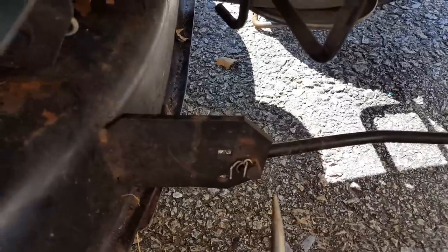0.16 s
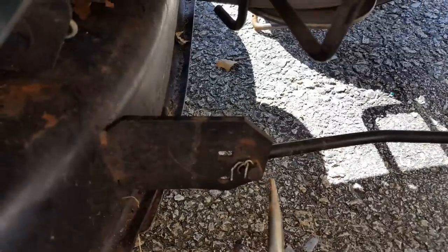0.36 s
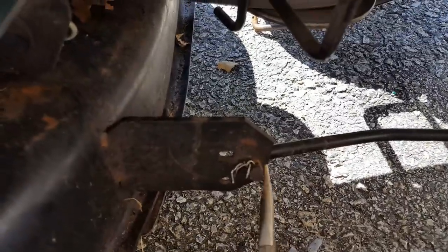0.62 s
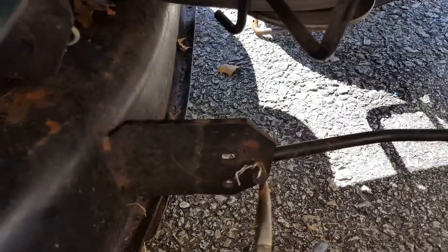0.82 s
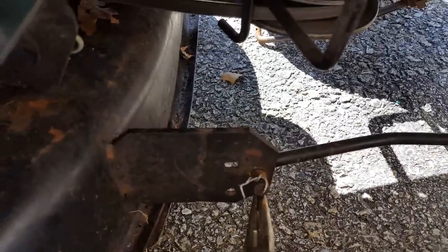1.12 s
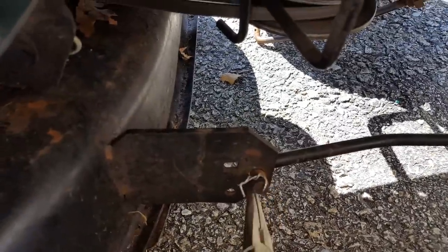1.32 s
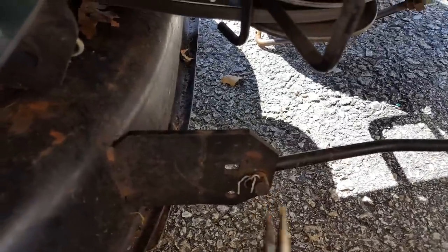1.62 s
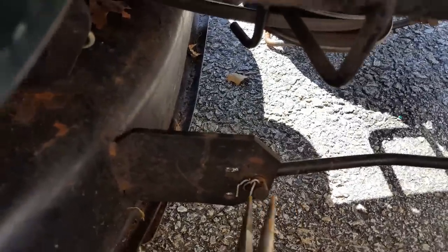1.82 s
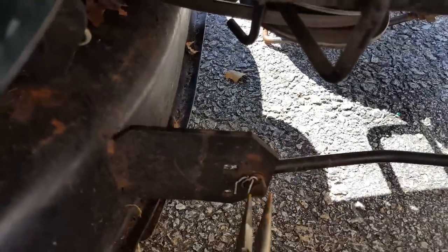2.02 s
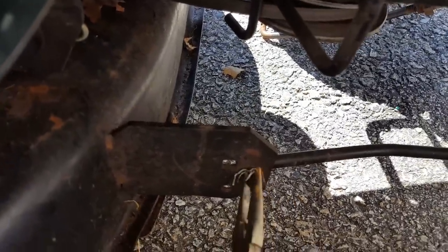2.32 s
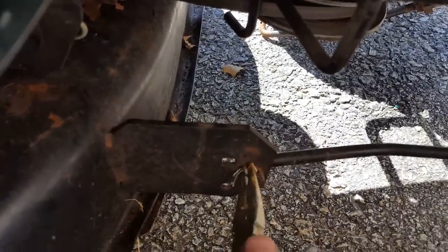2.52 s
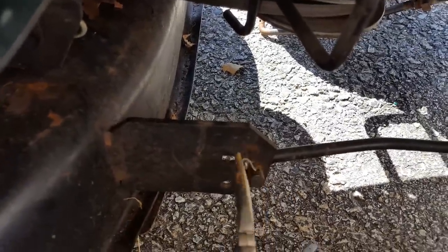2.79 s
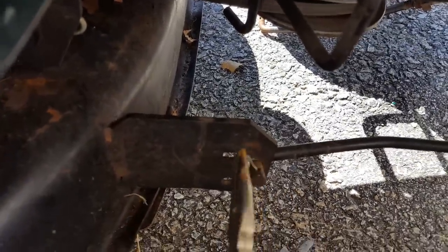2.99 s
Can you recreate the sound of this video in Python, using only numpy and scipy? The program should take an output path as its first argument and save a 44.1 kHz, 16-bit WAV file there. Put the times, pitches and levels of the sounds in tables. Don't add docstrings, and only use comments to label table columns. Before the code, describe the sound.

Close needle-nose pliers knock and scrape a wire on a steel bracket: near quiet first, a flurry of clacks, a pause, then louder, boomier knocks. Outdoors, phone microphone, faint bird, motor hum and traffic behind.

```python
import sys
import numpy as np
from scipy import signal
from scipy.fft import rfft, irfft
from scipy.io import wavfile
from scipy.ndimage import uniform_filter1d

SR = 44100
rng = np.random.default_rng(int(sys.argv[2]) if len(sys.argv) > 2 else 0)


def to_wav(s):
    ch = np.atleast_2d(s).T
    pcm = np.round(np.clip(ch, -1, 1) * 32767)
    wavfile.write(sys.argv[1], SR, pcm.astype(np.int16))


def natural_amplitude(level_db):
    exponent = np.asarray(level_db, float) / 20
    return 10 ** exponent


N = 138915

# pitch_hz, level_db
LEFT_TILT = [(200, 0.5), (600, -2), (2000, 6), (5000, 3), (14000, 9.5)]
ALIKE_HZ = 1430
LEFT_RIGHT = np.array([[1], [-1]])


def curve(table, hz):
    points = np.array(table, float)
    return np.interp(np.log(np.maximum(hz, 1)), np.log(points[:, 0]), points[:, 1])


def unit(x):
    return x / np.sqrt(np.mean(x ** 2))


def walk(rate_hz):
    hold = int(SR / rate_hz)
    steps = np.repeat(rng.standard_normal(N // hold + 1), hold)
    return 2 ** .5 * uniform_filter1d(uniform_filter1d(steps, hold), hold)[:N]


def decay(t, t60_s):
    return np.exp(-np.log(1000) * t / t60_s)


def add(out, start_s, x):
    i = int(start_s * SR)
    out[:, i:i + x.shape[1]] += x[:, :N - i]


def pliers():
    blow = steel()
    left, right = knocks(blow) + ticks(blow) + scrapes(blow)
    return np.array([left, np.roll(right, int(0.00024 * SR))])


def knocks(blow):
    # start_s, level_db, boom_db (deck), bright_db, favoured pitch_hz
    knock_events = [(.645, -20, -23.5, -27, 2380), (0.8115, -25, -16.5, -11, 2900),
                    (0.935, -31, -6, -22, 610), (1.094, -32, -4, -25, 1130), (1.534, -31, -4, -8.5, 4000),
                    (1.556, -54, -1.5, 9, 300), (2.295, -30.5, -12, -10.5, 700),
                    (2.393, -23.5, -12, -8, 1030), (2.553, -12.5, -9.5, -10.5, 1800),
                    (2.622, -26.5, -8, -6.5, 2700), (2.684, -15.5, -13, -8, 2800),
                    (2.719, -31.5, 1, -15.5, 400), (2.765, -14, -9, -5.5, 2740), (2.80, -41, 7, -26, 295),
                    (2.9989, -15.5, -19, -29.5, 1210)]
    out = np.zeros((2, N))
    for start_s, level_db, boom_db, bright_db, pitch_hz in knock_events:
        chatter_s = np.clip(.006 * natural_amplitude(.4 * (boom_db + 10)), .0005, .03)
        at = np.r_[0, rng.random(size=7)]
        hits = np.r_[1, .35 * rng.standard_normal(size=7)] * np.exp(-at)
        push = np.zeros(int(chatter_s * SR) + 2)
        np.add.at(push, (at * chatter_s * SR).astype(int), hits)
        struck = signal.fftconvolve(blow(boom_db, bright_db, pitch_hz), push[None])
        add(out, start_s, natural_amplitude(level_db - 0.5) * struck)
    return out


def ticks(blow):
    # start_s, level_db, boom_db (deck), bright_db
    tick_events = [(0.044, -45, -26, -19), (0.455, -53, -7, -6), (0.6168, -39, -8, -1.5),
                   (0.7659, -27.5, -21, -11.5), (0.9689, -44.5, -4.5, -13), (1.603, -35, -21, 0),
                   (1.648, -38.5, -26, -8), (2.168, -53.5, -25, 0.5), (2.2277, -62, -16, 7),
                   (2.285, -56, -6, 10), (2.2912, -45, -10, 6), (3.034, -52, 18, -20), (1.075, -47, 6, -23),
                   (.8153, -27, -25, -6), (.667, -30, -15, -28), (2.4464, -46.5, 5, -1.5),
                   (2.4758, -35.5, -9, -21), (2.941, -39.5, 4, -7), (2.9674, -34, -0.5, -16),
                   (3.029, -47.5, 2, -2), (3.1199, -33.5, 0.5, -10.5)]
    out = np.zeros((2, N))
    for start_s, level_db, boom_db, bright_db in tick_events:
        add(out, start_s, natural_amplitude(level_db - 4) * blow(boom_db, bright_db, 2160))
    return out


def scrapes(blow):
    # start_s, length_s, level_db, boom_db (deck), bright_db
    scrape_events = [(0.296, 0.079, -52.5, -14, -10), (0.647, 0.078, -27, -15.5, -29),
                     (0.738, 0.04, -32, -9, -11.5), (1.33, 0.12, -46.5, -15.5, -6.5),
                     (1.472, 0.2, -41, -12, -12.5), (1.536, 0.043, -29, -33, -10),
                     (2.398, 0.1, -39, -5.5, -18.5), (2.538, 0.0093, -32, -20, -31),
                     (2.63, 0.042, -36, 3, -31), (2.70, 0.096, -34, 2, -11), (2.952, 0.11, -39, 3, -9.5),
                     (3.049, 0.11, -43, -7, -12)]
    clicks_per_s, scatter_db, edge = 3700, 1.5, .17
    out = np.zeros((2, N))
    for start_s, length_s, level_db, boom_db, bright_db in scrape_events:
        chance, sign, size = rng.random((3, int(length_s * SR)))
        u = np.linspace(0, 1, len(chance))
        push = (chance < clicks_per_s / SR) * np.sign(sign - .5) * natural_amplitude(-scatter_db * np.log(size + 1e-6))
        push = unit(push) / 30 * np.clip(np.minimum(u, (1 - u) / 2) / edge, 0, 1)
        struck = signal.fftconvolve(blow(boom_db, bright_db, 333, jaw_ring=0.11), push[None])
        add(out, start_s, natural_amplitude(level_db) * struck)
    return out


def steel():
    # pitch_hz, level_db
    deck_colour = [(60, -20.5), (150, -1.5), (326, -3.5), (730, -8), (1200, -10), (1580, -13), (2380, -15),
                   (8000, -31.5)]
    # pitch_hz, t60_s
    deck_ring = [(100, 1), (300, 0.64), (1000, 0.5), (2500, 0.21), (8000, 0.084)]
    # pitch_hz, level_db, t60_s
    bracket_modes = [(170.3, -5, 0.48), (140.3, -13, 0.37), (232.4, -12, 0.48), (275.2, -10.5, 0.53),
                     (300, -8.5, 0.96), (331, -6.5, 0.92), (367.6, -6.5, 0.68), (604, -6.5, 0.7),
                     (709.5, -8.5, 0.63), (760, 3.5, 0.18), (1109, 9, 0.032), (1420, -7.5, 0.28),
                     (1886, -15, 0.12), (2338, -8.5, 0.11)]
    # pitch_hz, level_db, t60_s
    jaw_modes = [(4000, -18, 0.052), (5800, -7, .06), (6620, 3, 0.05), (6910, -27, .07), (8700, -10, 0.14),
                 (10500, -4, 0.044), (12300, -20, 0.093), (12740, -8, 0.071)]
    t = np.arange(int(.45 * SR)) / SR
    deck_hz = np.sort(rng.uniform(60 ** .5, 8000 ** .5, size=520) ** 2)
    deck_t60 = curve(deck_ring, deck_hz) * natural_amplitude(rng.standard_normal(len(deck_hz)))
    deck_db = curve(deck_colour, deck_hz) + 5 * np.log10(deck_hz / 1000) - 10
    bracket, jaw = np.array(bracket_modes), np.array(jaw_modes)
    hz = np.concatenate([deck_hz, bracket[:, 0], jaw[:, 0]])
    t60 = np.concatenate([deck_t60, bracket[:, 2], jaw[:, 2]])
    base_db = np.concatenate([deck_db, bracket[:, 1] - 2, jaw[:, 1] - 19])
    is_jaw = np.arange(len(hz)) >= len(hz) - len(jaw)
    modes = rings(hz, t60, 3.75, t).astype(np.float32)
    low = 1 / (1 + (hz / 1530) ** 4)
    high = 1 / (1 + (5000 / hz) ** 4)
    crack_hz = 4280
    crack_band = np.r_[signal.butter(2, crack_hz, "high", fs=SR, output="sos"),
                       signal.butter(1, 11000, fs=SR, output="sos")]
    snap_band = signal.butter(2, [830, crack_hz], "band", fs=SR, output="sos")

    def blow(boom_db, bright_db, favour_hz, jaw_ring=1):
        chance = rng.standard_normal((3, len(hz)))
        chance[0] = np.where(is_jaw, jaw_ring * np.clip(chance[0], -1.5, 1.5), np.sign(chance[0]))
        chance[1] *= np.abs(chance[0])
        favour_db = 4 * np.exp(-(np.log2(hz / favour_hz) / 0.36) ** 2 / 2) * ~is_jaw
        mode_db = base_db + favour_db + 1.5 * chance[2] / 2
        mode_db = mode_db + low * (boom_db + 8.5) + high * (bright_db + 18)
        gain = ears(hz, chance) * natural_amplitude(mode_db) / 4
        a, b = rng.standard_normal((2, len(t)))
        noise = np.array([a + 0.67 * b, a - 0.9 * b]) * natural_amplitude(2.2 * LEFT_RIGHT) * (1 - np.exp(-t / 0.00024))
        crack_env = decay(t, 0.026) + natural_amplitude(-16) * decay(t, 0.087)
        crack = natural_amplitude(2.5 + bright_db) * signal.sosfilt(crack_band, noise * crack_env)
        snap = signal.sosfilt(snap_band, noise[:, ::-1] * decay(t, 0.0037))
        snap = natural_amplitude(-4 - 0.42 * (boom_db + 10)) * snap
        return gain.astype(np.float32) @ modes + snap + crack
    return blow


def rings(hz, t60, rise_cycles, t):
    hz, t60 = np.asarray(hz, float)[:, None], np.clip(t60, .01, 2)[:, None]
    early = (1 + natural_amplitude(7) * decay(t, t60 * 0.48)) / 2
    rise = 1 - np.exp(-t * hz / rise_cycles)
    return np.sin(2 * np.pi * hz * t) * decay(t, t60) * early * rise


def ears(hz, chance):
    apart = hz / np.hypot(hz, ALIKE_HZ)
    return (chance[0] + apart * LEFT_RIGHT * chance[1]) * natural_amplitude(LEFT_RIGHT * curve(LEFT_TILT, hz) / 2)


def standouts():
    # start_s, pitch_hz, level_db, t60_s
    grip_modes = [(.617, 6600, -38.5, .03), (.646, 755, -32.5, 0.097), (.65, 422, -36, 0.25),
                  (.655, 2090, -41, 0.38), (.65, 2860, -40, 0.22), (.675, 700, -32, 0.083),
                  (.65, 3500, -41.5, 0.19), (.647, 6470, -54, .12), (.811, 2220, -30, 0.033),
                  (.813, 1350, -37.5, 0.083), (.815, 2700, -46.5, 0.22), (.812, 7200, -35, 0.039),
                  (.937, 585, -29, 0.11), (.965, 450, -33.5, 0.13), (.937, 1900, -40, 0.11),
                  (1.094, 1050, -33, 0.087), (1.1, 673, -36.5, .4), (1.108, 1050, -33, 0.1),
                  (1.54, 168, -34.5, 0.51), (1.553, 1100, -33, 0.16), (1.6, 1080, -52, .6),
                  (1.556, 250, -30, .15), (2.297, 685, -41.5, 0.47), (2.298, 2526, -46, 0.15),
                  (2.3, 3760, -45, 0.1), (2.296, 6610, -39, 0.056), (2.3, 10000, -57, 0.12),
                  (2.4, 1105, -31, 0.17), (2.395, 2040, -42, 0.26), (2.395, 2510, -39, 0.14),
                  (2.396, 8880, -64, .2), (2.428, 450, -32, 0.11), (2.558, 1102, -26, .5),
                  (2.68, 130, -30, .6), (2.57, 300, -25.5, 0.27), (2.56, 2230, -17.5, 0.047),
                  (2.622, 2900, -30, 0.036), (2.635, 300, -31, .15), (2.686, 1200, -28.5, 0.11),
                  (2.69, 1900, -31.5, 0.12), (2.71, 727, -24.5, 0.07), (2.7645, 2370, -17, .03),
                  (2.769, 196, -16, .05), (2.77, 1180, -23.5, 0.064), (2.773, 650, -27, .12),
                  (2.8, 300, -20.5, 0.056), (2.9985, 1320, -18, .06), (3.004, 1140, -22, 0.031),
                  (3.0, 3150, -34, 0.1), (3.121, 2060, -40, 0.041)]
    out, t = np.zeros((2, N)), np.arange(int(.4 * SR)) / SR
    flutter_db = 3 * walk(120)
    for k, (start_s, hz, level_db, t60_s) in enumerate(grip_modes):
        turn = 2 * np.pi * hz * t + LEFT_RIGHT * np.pi / 4 * hz / np.hypot(hz, ALIKE_HZ)
        tone = np.sin(turn) + natural_amplitude(-7) * np.sin(turn * 1.0252)
        env = decay(t, max(t60_s, .01)) * (1 - np.exp(-t * hz / 1.62))
        flutter = np.roll(flutter_db, k * N // len(grip_modes))[:len(t)] * (1 - np.exp(-t / .015))
        tilt_db = LEFT_RIGHT * curve(LEFT_TILT, min(hz, 5000)) / 2
        add(out, start_s, natural_amplitude(level_db + tilt_db + flutter) * env * tone)
    return out


def bird():
    # start_s, level_db
    chirp_notes = [(0.062, -68), (0.193, -66.5), (0.31, -64), (.434, -63), (0.557, -63)]
    top_hz, end_hz, length_s = 5300, 3720, .029
    out, u = np.zeros((2, N)), np.linspace(0, 1, int(length_s * SR))
    hz = end_hz + (top_hz - end_hz) * (1 - u) ** 2.19
    note = np.sin(2 * np.pi * np.cumsum(hz) / SR) * np.sin(np.pi * u ** 0.98) * natural_amplitude(2.1 * np.sin(17 * u))
    for start_s, level_db in chirp_notes:
        add(out, start_s, natural_amplitude(level_db) * note * natural_amplitude(.6 * LEFT_RIGHT))
        add(out, start_s + .018, natural_amplitude(level_db - 5) * note * LEFT_RIGHT)
    return out


def motor():
    # start_s, pitch_hz, level_db
    motor_speed = [
        (0, 99.9, -40),
        (.25, 99.6, -41.5),
        (.42, 98.6, -41.5),
        (.55, 98.8, -44),
        (.64, 89, -49.5),
    ]
    # multiple of pitch, level_db
    motor_orders = [(1.5, -18.5), (2, -29)]
    return drone(motor_speed, motor_orders, rough_db=4.0)


def engine():
    # start_s, pitch_hz, level_db
    engine_speed = [(.64, 83, -43), (.73, 75.9, -53), (.84, 74.1, -47), (1.08, 73.7, -51.5),
                    (1.34, 69.47, -48), (1.65, 66.77, -43), (1.95, 56.98, -50), (2.34, 51.6, -53),
                    (2.5, 50, -50), (2.6, 51.6, -62)]
    # multiple of pitch, level_db
    engine_orders = [(2, -3.5), (4, -17)]
    return drone(engine_speed, engine_orders, rough_db=6.0)


def drone(speed, orders, rough_db):
    (at_s, pitch_hz, level_db), t = np.array(speed).T, np.arange(N) / SR
    hz = np.interp(t, at_s, pitch_hz)
    turn = 2 * np.pi * np.cumsum(hz) / SR
    since_start = (t - at_s[0]) + (at_s[0] < .01)
    gate = np.clip(np.minimum(since_start, at_s[-1] - t) / 0.02 + .5, 0, 1)
    fade_db = 0.36 * np.minimum(hz - 75, 0)
    x = np.sin(turn)
    for k, order_db in orders:
        x = x + natural_amplitude(order_db + fade_db + rough_db * walk(12.02)) * np.sin(k * turn + k)
    return 2 ** .5 * x * natural_amplitude(np.interp(t, at_s, level_db)) * gate


def air():
    # pitch_hz, level_db
    air_colour = [(15, -55), (25, -18), (43, -11.5), (80, -3), (457, -24), (1120, -25), (4730, -47.5),
                  (14800, -61.5), (16500, -56)]
    f, out, power = np.fft.rfftfreq(N, 1 / SR), 0, 0
    swell_db = walk(0.51)
    for hz in 28 * 2 ** np.arange(10):
        octaves = np.clip(np.log2(np.maximum(f, 1) / hz), -1, 1)
        shape = natural_amplitude(curve(air_colour, f)) * np.clip(np.cos(np.pi / 2 * octaves), 0, 1)
        mid, side = irfft(rfft(rng.standard_normal((2, N))) * shape, N)
        power = power + np.mean(mid ** 2) * (hz > 120)
        width = (1 / 4 + hz / np.hypot(hz, 700)) * 0.74
        out = out + natural_amplitude(swell_db + 0.2 * walk(8.54)) * (mid + width * side * LEFT_RIGHT)
    return out * natural_amplitude(-56) / np.sqrt(power)


def scene():
    low = (motor() + engine()) * natural_amplitude(-1.2 * LEFT_RIGHT)
    return pliers() + standouts() + bird() + low + air()


def band_limit(x):
    return signal.sosfilt(signal.butter(12, 16990, fs=SR, output="sos"), x)


def record(dry):
    hiss_band = signal.butter(2, [9500, 16500], "band", fs=SR, output="sos")
    hiss = natural_amplitude(-72.5) * signal.sosfilt(hiss_band, rng.standard_normal(dry.shape))
    top_cut = signal.cheby1(12, .5, 15900, fs=SR, output="sos")
    return band_limit(signal.sosfilt(top_cut, dry + hiss))


dry = scene()
out = record(dry)
to_wav(out)
```